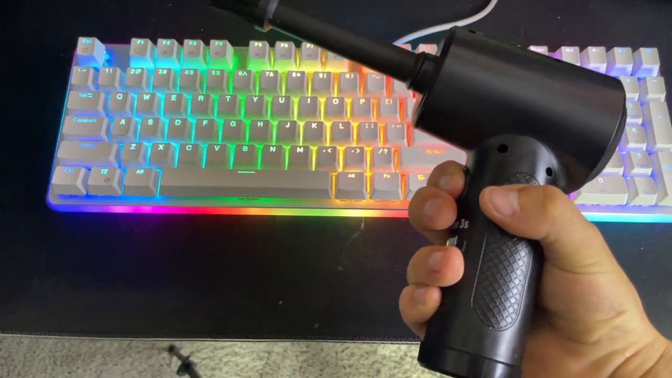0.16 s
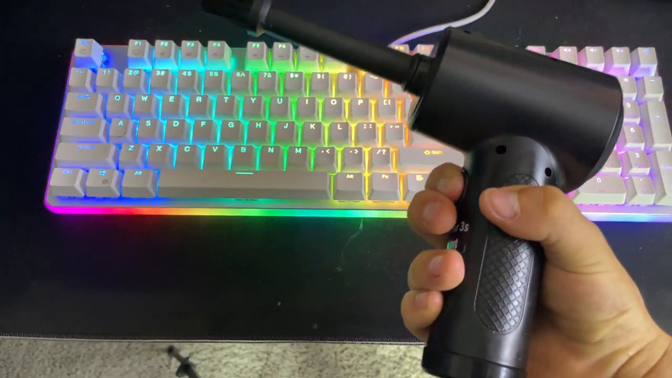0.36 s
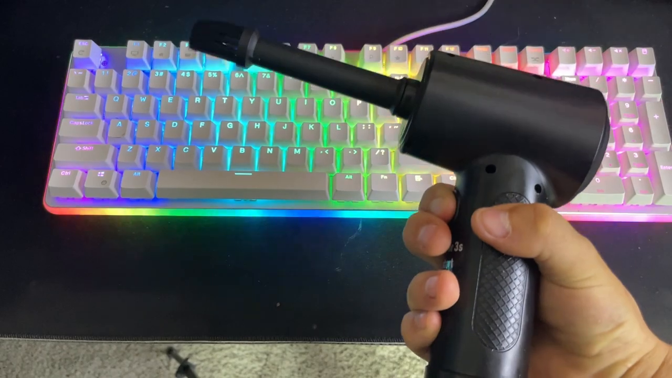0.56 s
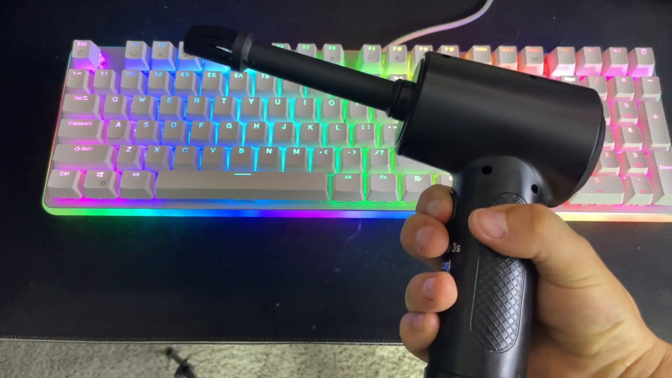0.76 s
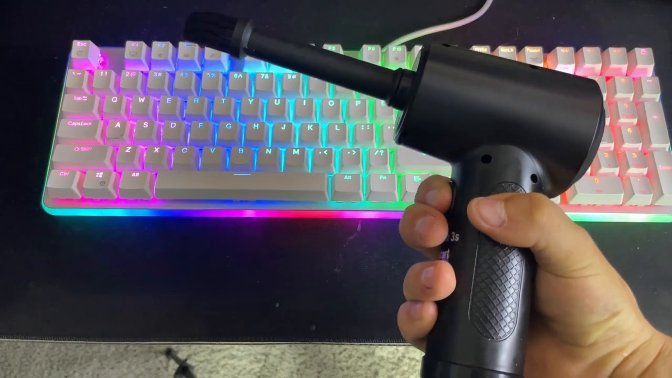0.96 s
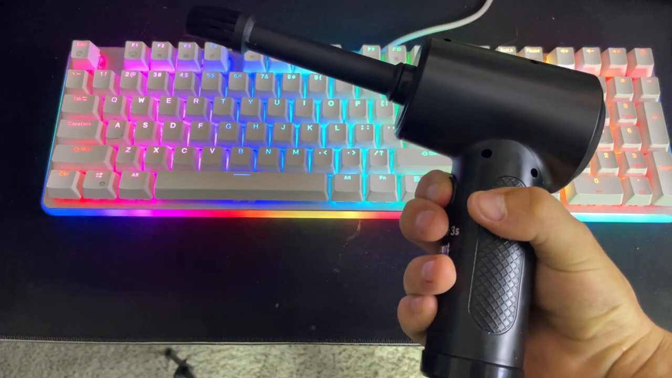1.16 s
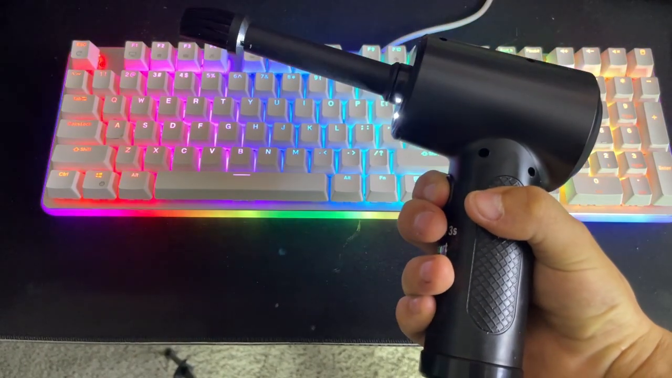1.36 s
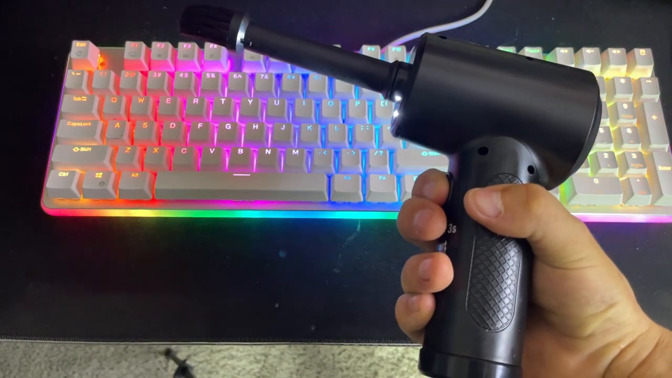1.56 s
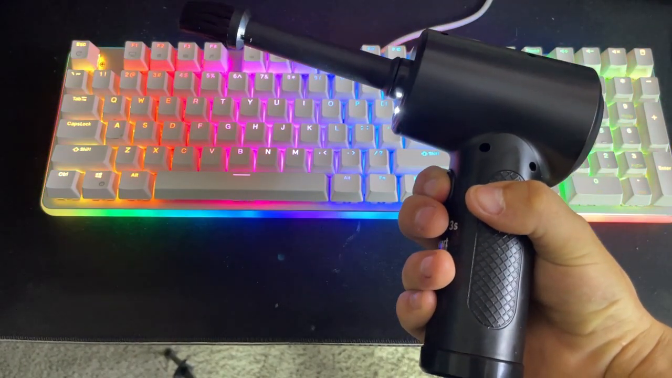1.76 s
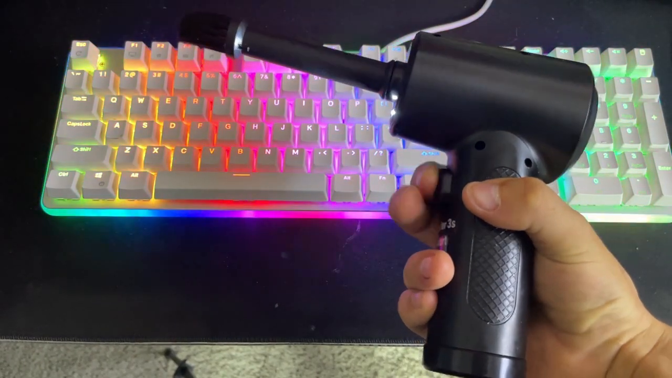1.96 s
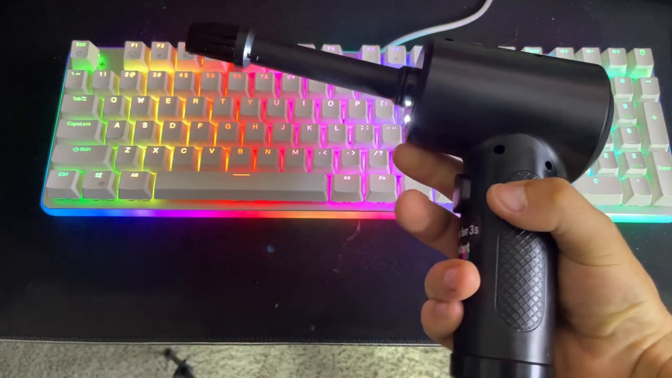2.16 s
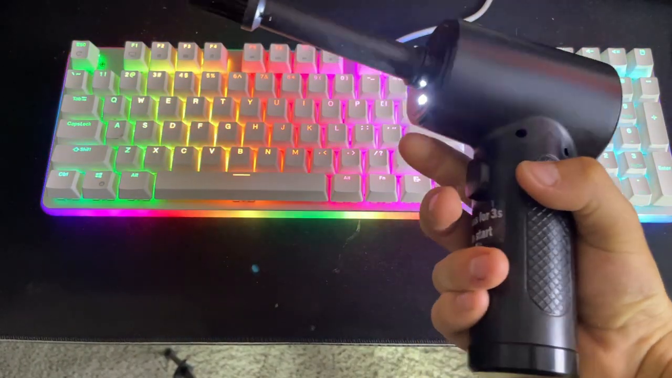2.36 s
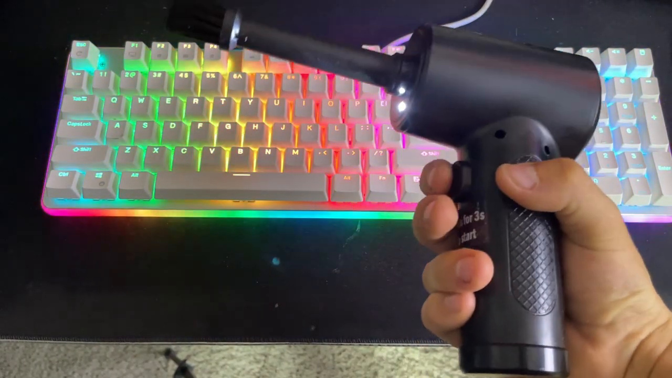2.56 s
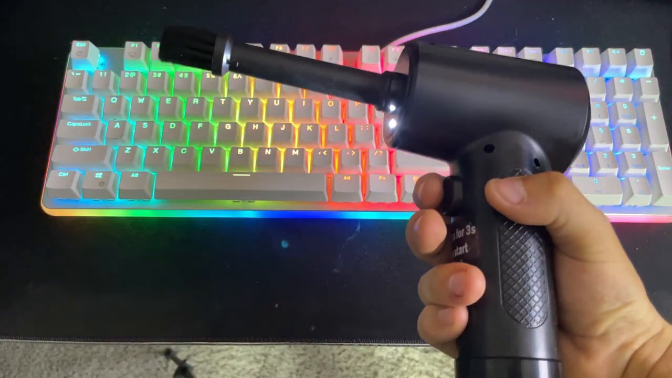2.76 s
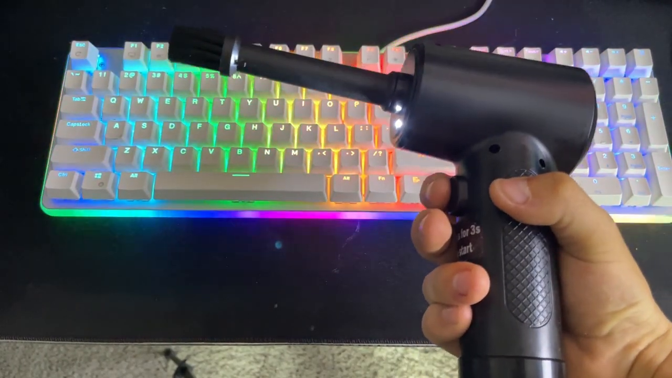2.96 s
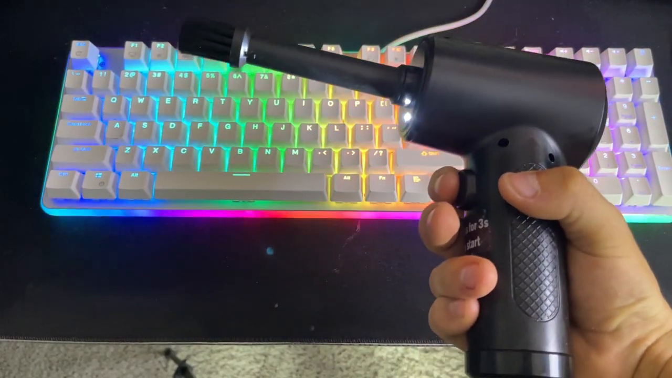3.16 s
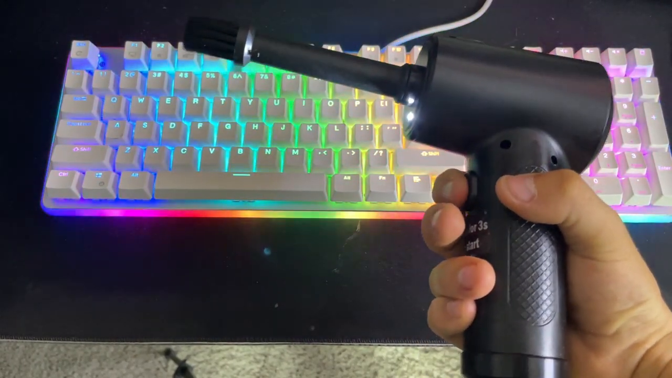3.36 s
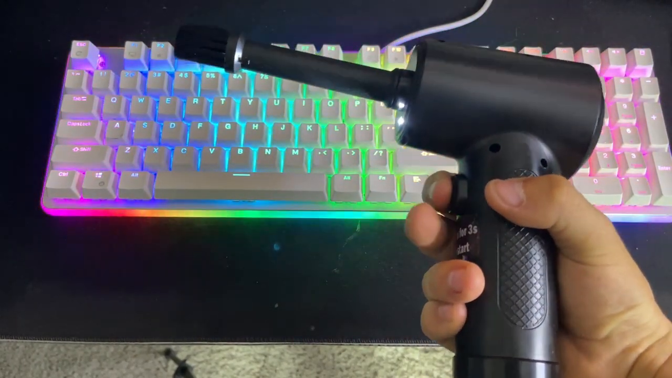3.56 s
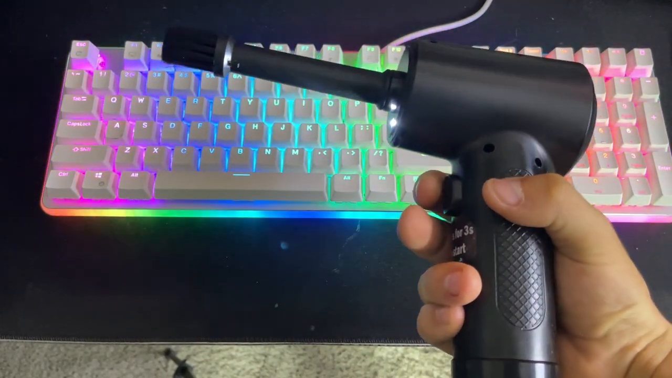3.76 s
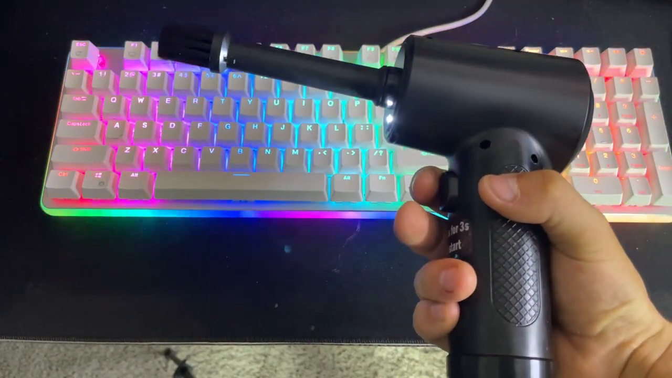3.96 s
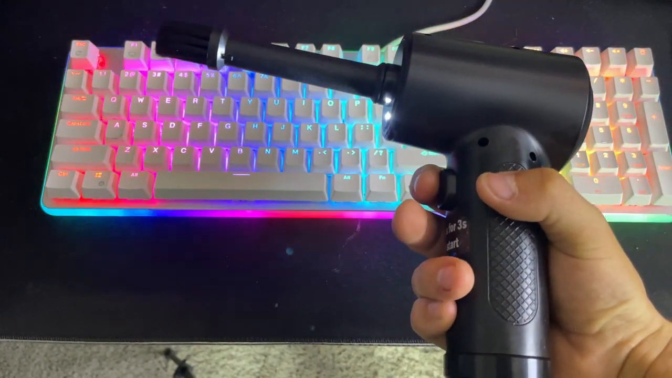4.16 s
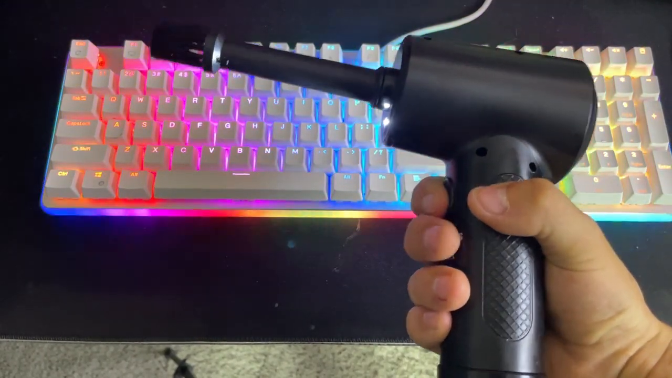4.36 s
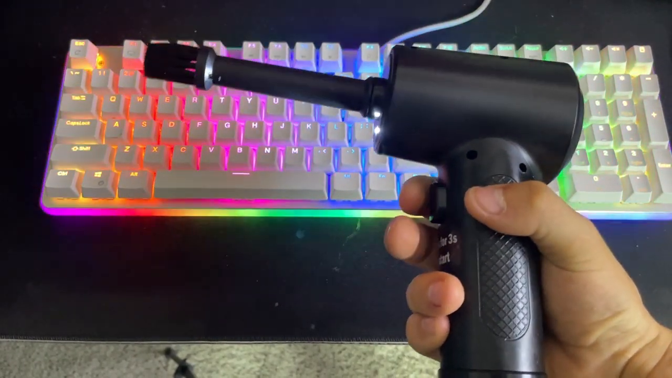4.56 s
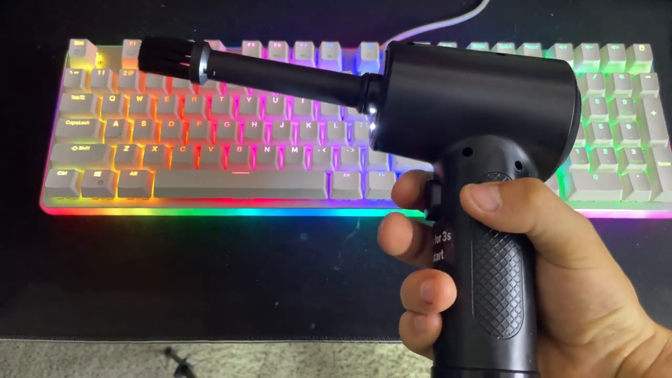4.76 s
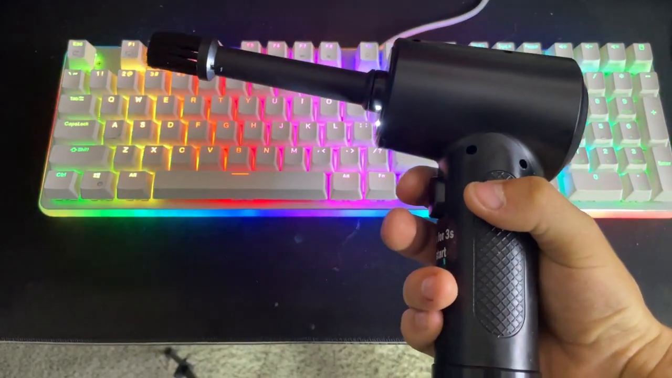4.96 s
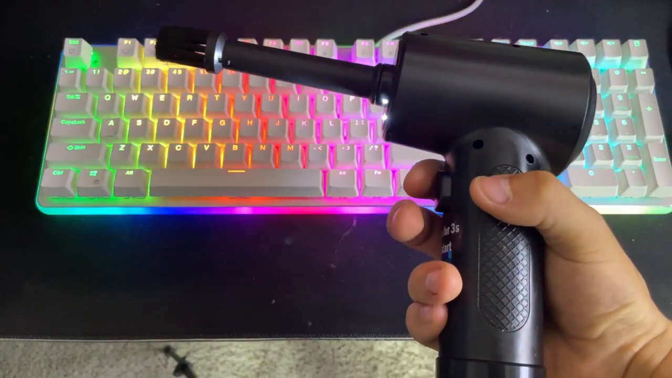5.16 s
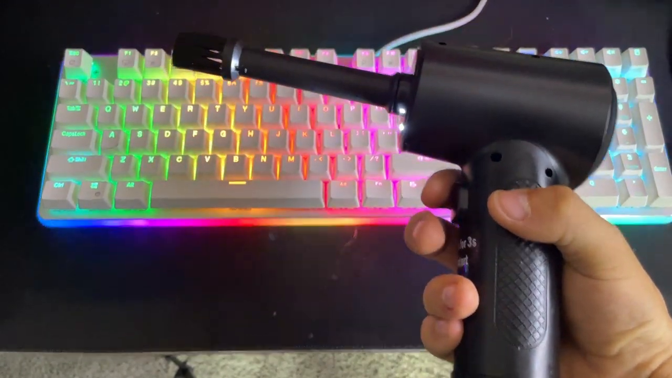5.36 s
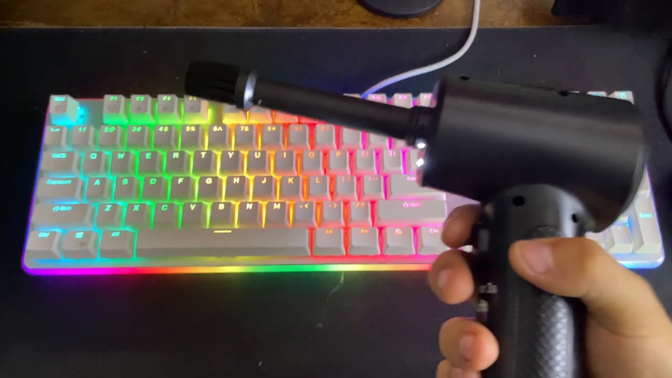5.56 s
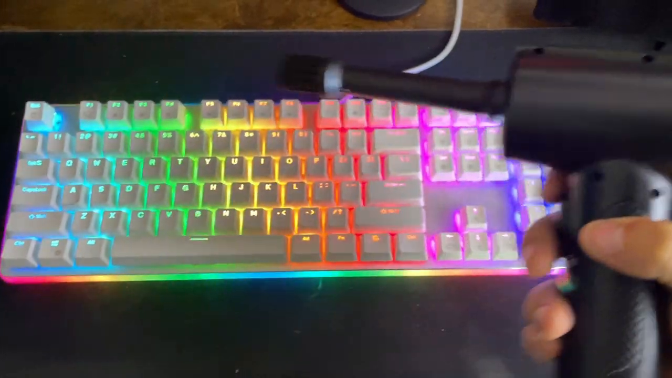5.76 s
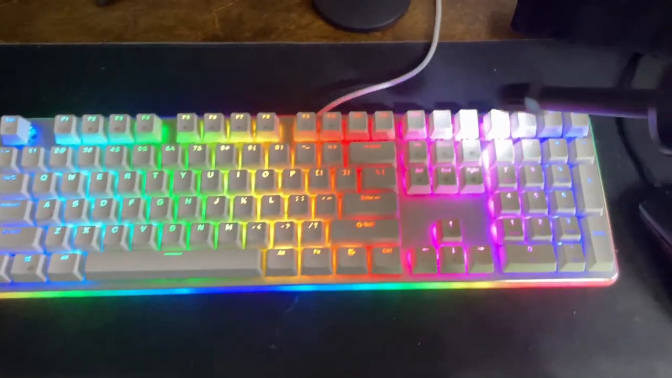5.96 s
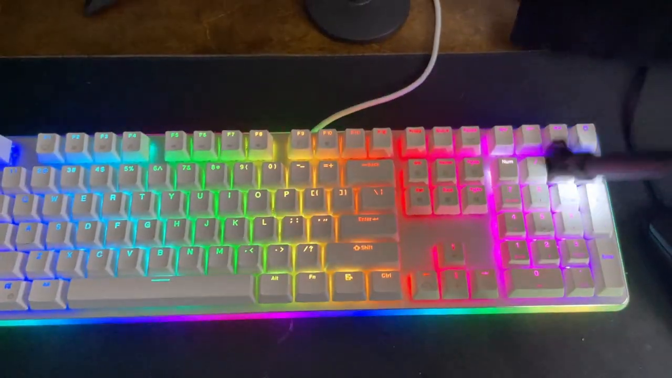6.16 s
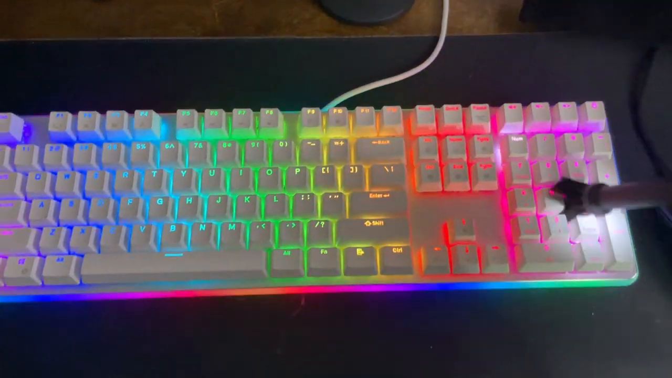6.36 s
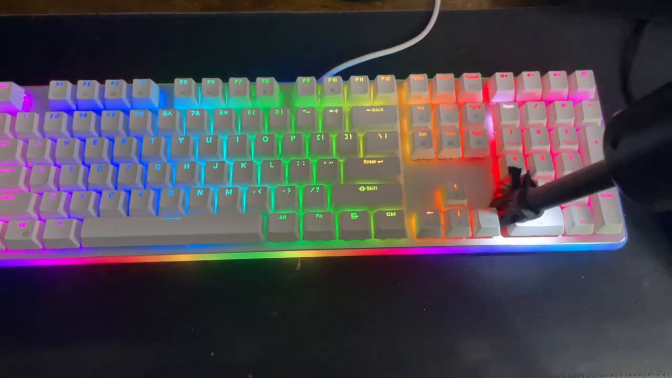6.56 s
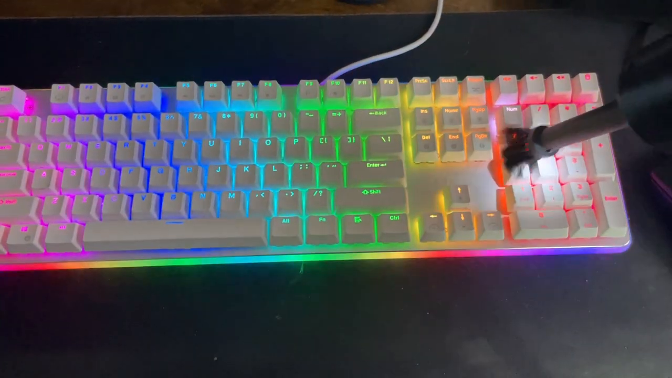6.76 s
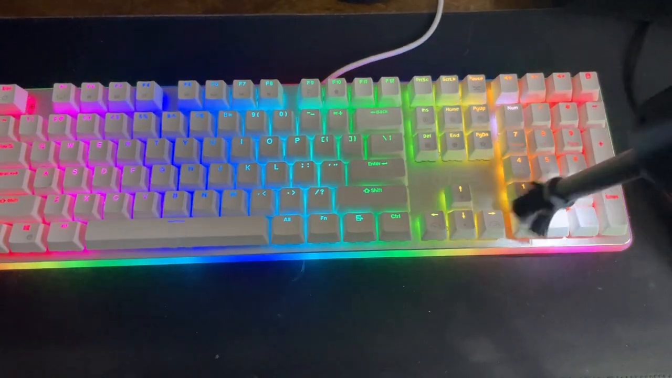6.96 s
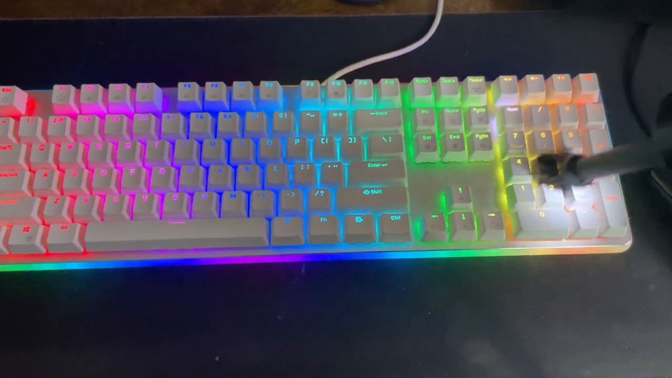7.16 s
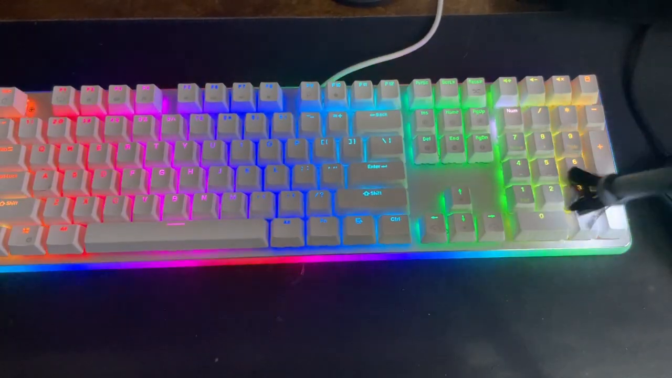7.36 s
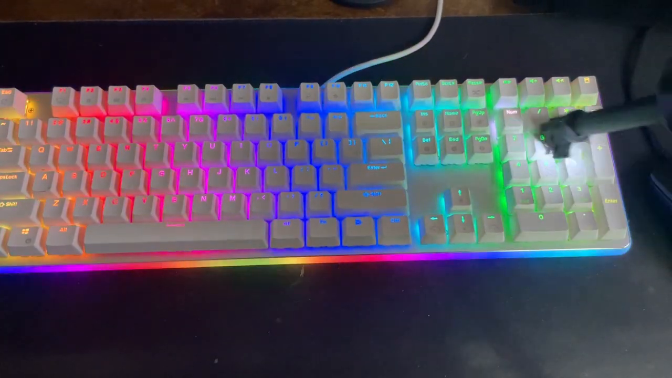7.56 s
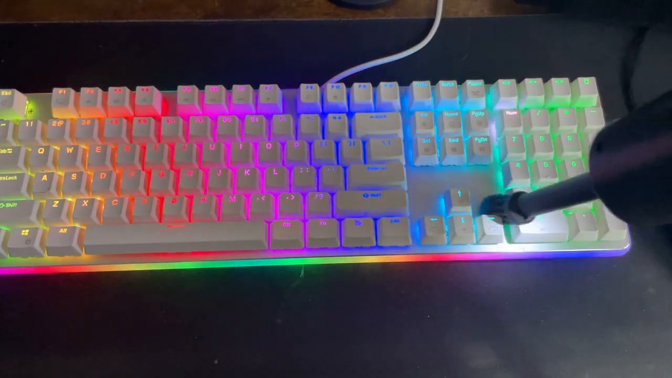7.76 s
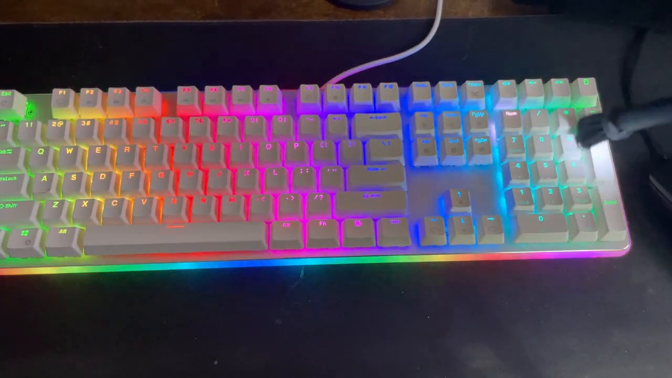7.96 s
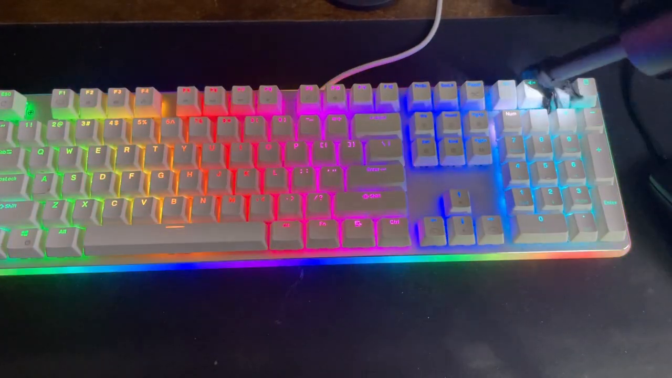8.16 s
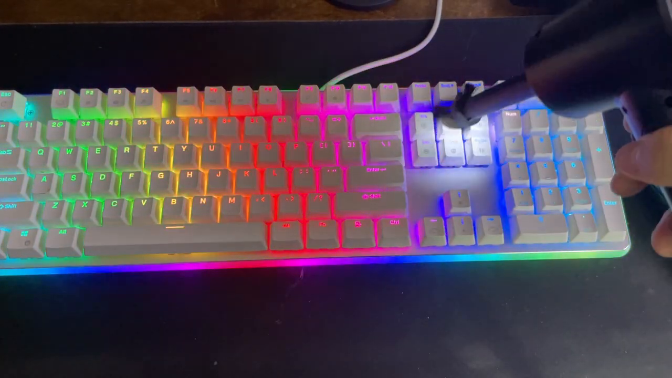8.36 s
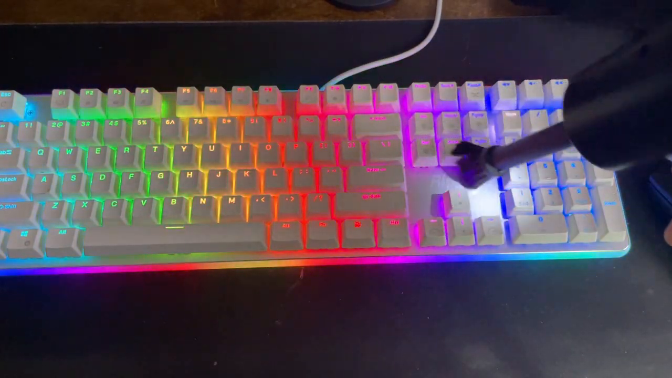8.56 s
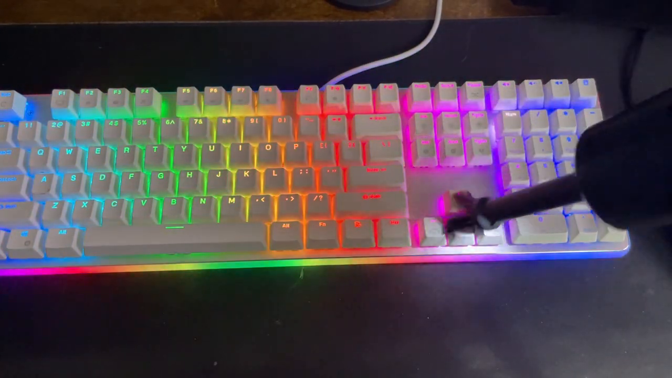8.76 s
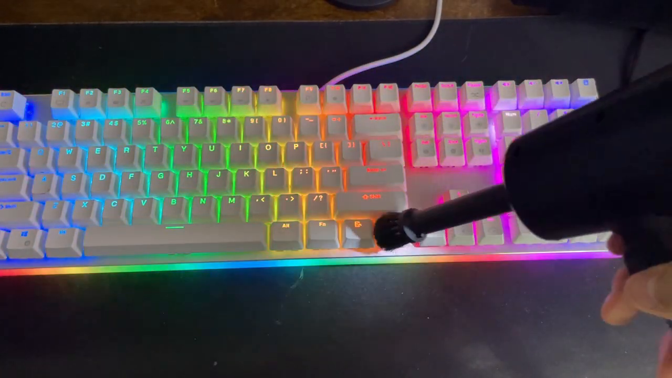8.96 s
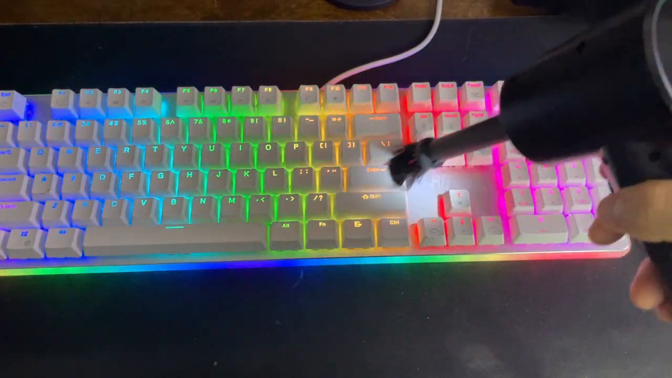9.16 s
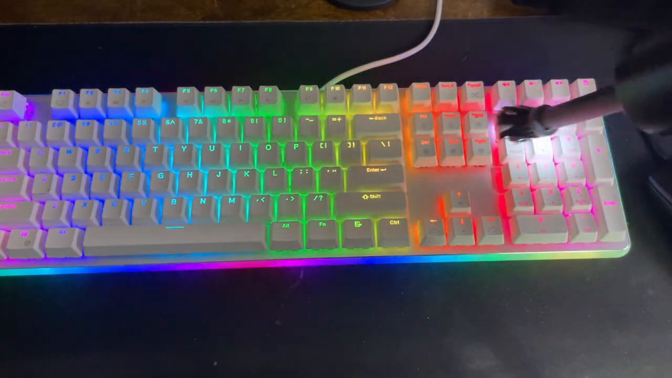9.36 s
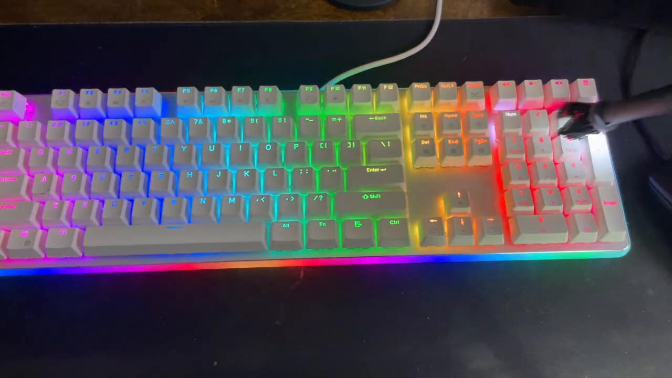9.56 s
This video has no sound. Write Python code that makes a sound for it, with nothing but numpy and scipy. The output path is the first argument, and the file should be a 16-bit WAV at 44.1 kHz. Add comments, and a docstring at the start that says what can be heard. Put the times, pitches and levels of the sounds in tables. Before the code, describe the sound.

For about 1.4 seconds there is only a quiet indoor murmur with low rumble and very faint mains hum, plus tiny soft clicks near 0.25 and 0.5 and a small button release at 1.34. From 1.5 a handheld air duster's motor spins up, buzzing first, then whining higher in steps. A tight burst of bright clicks lands around 1.95. By 3 seconds the whine is strong and the air is a broad roar; pitch and hiss keep rising until about 5.3, reaching a steady shrill tone near 785 hertz with higher overtones. Between 5.5 and 6 the duster swings round, the air dips and its colour shifts. From 6 to 9.7 the jet sweeps the keyboard, with short puffs, fluttering rasp, airy whistle and bright hiss shifting across the close stereo image. The motor stays on throughout.

```python
"""Faint clicks and a button release sound in a quiet room, beside a phone with two microphone ports.
A cordless air duster's motor then spins up in steps: a whine of shaft orders, and air noise set by speed.
Bright clicks fall early in the spin-up. Later the nozzle turns away and sweeps its jet over a keyboard:
band noises puff and flutter, and the phase and level between the ports change with the aim.
A low murmur and a mains hum run throughout."""
import sys
import numpy as np
from scipy import signal
from scipy.fft import rfft, irfft, next_fast_len
from scipy.io import wavfile
from scipy.ndimage import uniform_filter1d, map_coordinates

SR = 44100
rng = np.random.default_rng(int(sys.argv[2]) if len(sys.argv) > 2 else 0)


def persist_wave(psi):
    """Save psi, clipped to +-1, as 16-bit WAV."""
    counts = np.round(np.clip(psi, -1, 1) * 32767).astype(np.int16)
    wavfile.write(sys.argv[1], SR, np.atleast_2d(counts).T)


N = 427769
TOP_HZ = 15850  # upper band limit
ROTOR_LAG_S = .158

# drive steps, the last a slight sag once the jet meets the keys: start_s, new_speed_turns_per_s, ramp_s
SPEED_STEPS = [(1.472, 144.6, .273), (1.745, 371.9, .492), (2.238, 577.5, .483), (3.605, 690.6, .341),
               (4.491, 785.4, .295), (5.183, 789, .414), (5.873, 782.2, .738)]


def speed():
    """Rotor turns per s: ramped drive steps through a first-order inertial lag."""
    t = np.arange(N) / SR

    def lagged_ramp(u):
        return u - ROTOR_LAG_S * (1 - np.exp(-u / ROTOR_LAG_S))

    turns_per_s, before = np.zeros(N), 0
    for start_s, target, ramp_s in SPEED_STEPS:
        since_start = np.clip(t - start_s, 0, None)
        since_end = np.clip(t - start_s - ramp_s, 0, None)
        slope = (target - before) / ramp_s
        turns_per_s += slope * (lagged_ramp(since_start) - lagged_ramp(since_end))
        before = target
    return np.abs(turns_per_s)


REFERENCE_TURNS_PER_S = 800
BETWEEN_DB = -56  # order level off its modes, at reference speed, before dulling
FLICKER_DB_PER_KHZ, DULLED_DB_PER_KHZ = .3, .45  # higher lines waver more and are weaker

# order gliding through a housing mode: shaft_multiple, mode_hz, half_width_hz, level_before_dulling_db
ORDER_SURGES = [(4, 1075, 65, -49), (4, 1270, 80, -51), (4, 1670, 60, -47), (4, 1800, 90, -42),
                (4, 2280, 90, -51), (4, 2670, 130, -46), (5, 1150, 150, -51), (5, 1915, 85, -36.5),
                (5, 2180, 100, -43), (5, 2800, 250, -54), (5, 3100, 200, -46), (5, 3800, 150, -42),
                (6, 600, 200, -63), (6, 900, 70, -54), (6, 1090, 100, -41), (6, 1910, 70, -49),
                (6, 1450, 150, -55), (6, 2250, 200, -43), (6, 2570, 100, -48), (6, 3100, 200, -47),
                (6, 3450, 150, -53), (6, 4110, 100, -40), (6, 4650, 130, -40), (7, 1890, 140, -48),
                (7, 3580, 80, -42), (7, 4200, 150, -47), (7, 5380, 150, -44), (8, 1980, 120, -50),
                (8, 3210, 100, -49), (8, 4190, 80, -48), (9, 950, 150, -58), (9, 1250, 170, -53),
                (9, 1970, 150, -48), (9, 2180, 130, -54), (9, 2750, 130, -56), (9, 3150, 170, -46),
                (9, 4050, 200, -54), (9, 4800, 130, -47), (9, 5250, 200, -47), (9, 6400, 300, -40),
                (9, 7050, 150, -39), (10, 2130, 130, -57), (10, 1300, 200, -65), (11, 2200, 120, -55),
                (11, 3200, 130, -57), (12, 1020, 170, -51), (12, 1500, 200, -65), (12, 2230, 170, -52),
                (12, 3170, 200, -52), (12, 4600, 130, -52), (12, 6650, 250, -41), (12, 6900, 100, -47),
                (13, 3120, 200, -53), (13, 4000, 130, -58), (13, 5000, 130, -53), (14, 1100, 200, -62),
                (14, 2050, 130, -56), (14, 3200, 150, -53), (14, 4100, 130, -56), (14, 5000, 150, -52),
                (14, 6200, 350, -53), (15, 1000, 250, -62), (15, 2100, 250, -58), (15, 3170, 190, -44.5),
                (15, 4100, 150, -54), (15, 5320, 200, -52), (15, 6600, 500, -50), (15, 10800, 400, -48),
                (16, 1150, 200, -64), (16, 2300, 130, -58), (16, 3350, 180, -55), (16, 4800, 180, -58),
                (16, 12520, 200, -49), (17, 2150, 200, -57), (18, 1000, 150, -57), (18, 2350, 150, -59),
                (18, 3500, 150, -57), (18, 5170, 200, -56), (18, 6800, 350, -48), (18, 10450, 350, -51),
                (19, 2250, 200, -61), (19, 5250, 200, -56), (21, 1050, 200, -63), (21, 2200, 150, -65),
                (21, 12130, 100, -46), (21, 3480, 200, -57), (21, 5480, 200, -57), (24, 1050, 200, -65),
                (24, 2300, 200, -60), (24, 3600, 200, -62), (27, 1050, 200, -66), (27, 2200, 200, -64),
                (27, 3850, 450, -61), (27, 5300, 250, -60), (27, 6950, 300, -53), (29, 5300, 200, -60),
                (29, 6900, 400, -56), (31, 6950, 400, -52), (33, 7000, 350, -59), (36, 5400, 250, -63),
                (36, 7050, 350, -57)]


def higher_orders(turns_per_s, angle):
    """Each higher shaft order grows with speed and surges as it crosses housing modes."""
    whine = np.zeros(N)
    speeds = np.arange(0, 2 * REFERENCE_TURNS_PER_S, .5)
    for order in sorted({row[0] for row in ORDER_SURGES}):
        body = amp(BETWEEN_DB) * speeds / REFERENCE_TURNS_PER_S
        for multiple, mode_hz, half_hz, db in ORDER_SURGES:
            if multiple == order:
                body = body + amp(db) * np.exp(-((order * speeds - mode_hz) / half_hz) ** 2)
        in_band = order * speeds < TOP_HZ
        level = np.interp(turns_per_s, speeds, body * in_band)
        khz = order * turns_per_s / 1000
        flicker_db = (1 + FLICKER_DB_PER_KHZ * khz) * wobble(22)
        tone = np.sin(order * angle + rng.uniform(0, 2 * np.pi))
        whine += level * amp(flicker_db - DULLED_DB_PER_KHZ * khz) * tone
    return whine


SECOND_AIMED_DB = -9  # second-order change once aimed at the keys

# first order, notched by shell and desk: speed_turns_per_s, base_db, left_right_db, left_lead_rad
IMBALANCE_BY_SPEED = [(79, -82, 0, 0), (206, -74, 0, 0), (229, -51, -2, 0), (325, -49, -5, .2),
                      (387, -36.5, -4, 0), (437, -36, -3, -.2), (445, -55, -9, -.3), (467, -37, -5, -0.093),
                      (533, -25.5, -2, 0), (584, -25.5, -3, .1), (631, -23.5, -0.5, -0.31),
                      (658, -23, -5, -0.56), (674, -32.5, -4, -.6), (677.5, -26, -4.5, -0.74),
                      (717, -24, 3, -0.59), (796.6, -20, 9.5, 0.0058)]
# second order: speed_turns_per_s, base_db
SECOND_BY_SPEED = [(79, -85), (220, -70), (280, -62), (350, -60), (385, -56), (415, -48), (460, -45),
                   (485, -57), (520, -58), (570, -55), (600, -47), (645, -46), (685, -44), (710, -41),
                   (745, -45), (785, -34.5)]
# third order: speed_turns_per_s, base_db
THIRD_BY_SPEED = [(20, -90), (80, -72), (165, -64), (190, -68), (234, -66), (250, -50), (284, -49),
                  (300, -57), (318, -48), (334, -39.5), (350, -37.5), (372, -37.5), (388, -40), (405, -50),
                  (435, -44), (480, -37), (530, -38.5), (574, -34.5), (595, -33), (620, -43), (648, -38),
                  (668, -44), (687, -35), (710, -31), (740, -35), (770, -39), (785, -48.5)]
# duster position and aim: changes of first and third order over time, added:
# time_s, first_db, first_left_right_db, first_left_lead_rad, third_db
ORDER_CHANGES = [(5.0, 0, 0, 0, 0), (5.3, 2, -2, .8, 0), (5.65, 2, -9, .8, 3), (5.95, -6, -7, .9, -1),
                 (6.2, -7, -14, 1.3, 10), (6.5, -7, -6, 1.1, 5), (6.8, -5, -4, .9, 4),
                 (7.4, -5, -11, 1.3, 3), (7.7, -4, -6, 1.2, 7), (8.0, -7, -10, .9, 2), (8.3, -7, -7, .7, 6),
                 (8.6, -4, -5, 1.1, 11), (9.2, -4, -3, 1.3, 6), (9.5, -8, -9, .8, -1),
                 (9.7, -9, -9, .8, -1)]


def motor():
    """Rotor imbalance sings at shaft speed; magnets and blades add higher orders through the housing."""
    turns_per_s, changes = speed(), curves(ORDER_CHANGES)
    first_db, pan_db, lead_rad = along(IMBALANCE_BY_SPEED, turns_per_s) + changes[:3]
    second_db = along(SECOND_BY_SPEED, turns_per_s) + SECOND_AIMED_DB * aim()
    third_db = along(THIRD_BY_SPEED, turns_per_s) + changes[3]
    angle = 2 * np.pi * np.cumsum(turns_per_s + 0.77 * wobble(40)) / SR
    phases = angle + np.array([lead_rad, -lead_rad]) / 2
    first = amp(first_db + 0.34 * wobble(30)) * sides(pan_db) * np.sin(phases)
    second = amp(second_db + 1.6 * wobble(8.7)) * np.sin(2 * angle)
    third = amp(third_db + 2.2 * wobble(25)) * np.sin(3 * angle)
    whine = second + third + higher_orders(turns_per_s, angle)
    return np.sqrt(2) * (first + heard(np.array([whine, 0.22 * whine])))


# shell bands: centre_hz, width_hz, relative_db
SHELL_BANDS = [(560, 300, 0), (790, 60, 1), (1030, 260, 0), (2150, 220, 1), (3250, 300, -7),
               (3800, 300, -6), (4700, 300, -15), (5300, 400, -12), (6000, 400, -15), (6900, 700, -9)]
# buzz level: speed_turns_per_s, level_db
BUZZ_BY_SPEED = [(0, -120), (6, -90), (14, -75), (25, -68), (45, -62), (65, -58), (140, -55), (220, -52),
                 (300, -51), (785, -55)]


def buzz():
    """Rough rotor noise fills the shell's bands, at a level set by speed."""
    def shell(hz):
        return sum(amp(db) * peak(hz, centre, width) ** 2 for centre, width, db in SHELL_BANDS)
    return heard(amp(along(BUZZ_BY_SPEED, speed())) * patchy_noise(shell, patchy_db=3.0))


TUBE_WIDTH_HZ = 144

# tube note, drifting with distance to the keys: time_s, centre_hz, added_db
TUBE_DRIFT = [(5.5, 1175, -1), (5.85, 1180, 4.5), (6.2, 1185, 10), (6.75, 1184, 8), (6.95, 1137, 7.5),
              (7.3, 1123, 4), (7.75, 1130, 8.5), (8.1, 1152, 3), (8.7, 1108, 7), (9.0, 1140, 3),
              (9.4, 1152, 6), (9.7, 1153, 6)]


def tube_note():
    """Narrow tube-resonance noise, frequency-shifted to a sliding centre; also its level in dB."""
    centre_hz, db = curves(TUBE_DRIFT)
    pair = patchy_noise(lambda hz: peak(hz, centre_hz[0], TUBE_WIDTH_HZ) ** 2, patchy_db=1.0)
    slide = 2 * np.pi * np.cumsum(centre_hz - centre_hz[0]) / SR
    quadrature = filtered(pair, lambda hz: -1j * (hz > 0))
    return pair * np.cos(slide) - quadrature * np.sin(slide), db


UPPER_ROAR_HZ = 1750
LOW_RASP_TO_HZ, UPPER_RASP_HZ, TOP_RASP_HZ = 3000, 3700, 5070
WHISTLE_HZ, WHISTLE_WIDTH_HZ = 6620, 1830
BODY_SHOWN_PAN_DB, BODY_AIMED_PAN_DB = 1.2, -1.2  # left-right

# noise spectra: freq_hz, relative_db_per_hz
ROAR_SHAPE = [(90, -120), (130, -24), (300, -13), (700, -5), (1000, -5), (1500, -4.5), (1900, 1.5),
              (2300, 1.5), (2700, -10), (3200, -120)]
RASP_SHAPE = [(2000, -120), (2600, -0.5), (3200, 1), (3700, -1), (4200, -6), (4700, -5), (5300, -4.5),
              (5900, -8.5), (7000, -120)]
HISS_SHAPE = [(4500, -120), (5600, -2), (6500, -3.5), (8000, 8.5), (9200, 3), (10000, 3), (12000, 3.5),
              (13500, 3), (15000, -1), (17000, -4)]
# air flow: speed_turns_per_s, relative_db
FLOW_BY_SPEED = [(8, -70), (25, -53), (60, -48), (123, -29), (213, -22), (327, -17.5), (415, -12.5),
                 (501, -8.5), (577, -6), (688, -2.5), (785, 0)]
# roar, tube, rasp, whistle, hiss: base_db, flow_steepness, puff_share, flutter_db
AIR_LAYERS = [(-28, 0.92, 0.085, 0.5), (-44, 0.67, 0.43, 1), (-27, 0.99, 0.83, 0.21),
              (-33.5, 1.26, 0.052, 0.52), (-31, 0.97, 0.15, 0.77)]
# nozzle aim, added: time_s, roar_db, rasp_db, whistle_db, hiss_db, whistle_left_right_db
NOZZLE_SWEEP = [(3.0, 2, -1.5, 4, -0.5, -0.5), (3.55, 2.5, -1, 2, 0, -1), (4.3, 2.5, 0.5, 3.5, 0.5, -.3),
                (5.3, 0, 1, 1.5, 0.5, -1), (5.45, -1.5, -0.5, -1, -0.5, -1), (5.58, -2, -3.5, -4.5, -3, -1),
                (5.76, -7.5, -8, -7, -3.5, 1), (5.86, -5, -5.5, -2, -3, 5), (5.97, -1, -7, 4, 1, -3),
                (6.3, -2.5, -5.5, 4.5, 2, -2), (6.72, -3, -3.5, 4.5, 3, 0), (6.9, -1.5, -4.5, 3, 3.5, 5),
                (7.05, -2.5, -4.5, 6, 3.5, -1), (7.4, -4, -4.5, 3.5, 2, -2.5), (7.78, -1.5, 1, 4.5, 4, 4),
                (7.95, -4, -3, 4.5, 2, -3), (8.2, -3.5, -5, 0, 0, 2), (8.4, -4, 0.5, -7, 2, 4),
                (8.6, -1.5, -2, 0.5, 2.5, 7), (8.78, -2, -2, 4.5, 3, 3), (8.95, -1, -0.5, -3.5, 2, 5),
                (9.25, -3.5, -0.5, -5.5, 2, 6), (9.45, -4, -2, 5, 1, 0), (9.7, -4.5, -3.5, 2, 0.5, -3)]
# jet crossing gaps between keys: time_s, puff_db, half_length_s, extra_upper_rasp_db
GAP_PUFFS = [(6.166, 5.5, .03, -2.5), (6.323, 1.5, 0.069, 6), (6.56, 7.5, .03, -2.5), (6.86, 6.5, 0.05, 3),
             (7.162, 3.5, .03, 0), (8.045, 5.5, .02, 1), (8.713, 8.5, .025, -3.5), (8.91, 3.5, 0.033, -4)]
# colour of the jet on the keys: time_s, upper_roar_db, middle_rasp_db, top_rasp_db
JET_TINT = [(5.4, 1.5, 4.5, -17), (5.55, -2, 0.5, 1), (5.85, 2, 1.5, -5), (6.05, 0, 4.5, 11),
            (6.2, 3.5, 6.5, 5), (6.33, -1, 4, -8), (6.42, -1.5, 6, 1), (6.52, 2, 4, -8), (6.7, 1, 0.5, -3),
            (6.95, 2.5, 4.5, 0), (7.12, 0.5, 1.5, 1), (7.3, 3, 2.5, 1), (7.42, -1.5, 4, 5), (7.6, 2, -2, 1),
            (7.75, 2.5, 3, -13), (7.9, -0.5, 0.5, -1), (8.1, 2.5, 1, 1), (8.3, 4.5, -2, 2.5),
            (8.6, 3.5, 2, 1), (8.78, 1.5, 6, -7), (8.92, 1.5, -1.5, 1), (9.05, 3.5, -3, 3),
            (9.17, 3, -4, 6.5), (9.28, 4.5, -2, 2), (9.42, 4.5, -2, -2), (9.55, 0, 4, -1), (9.7, 2, 2, 0)]
# lowest part of the rasp: time_s, added_db
LOW_RASP_LEVEL = [(5.7, -3), (5.9, 1), (6.2, 0), (6.38, -8), (6.6, 2.5), (6.9, -0.5), (7.1, -1), (7.28, 1),
                  (7.4, -4), (7.65, 4), (7.85, -3), (8.1, -2), (8.35, 0), (8.55, 1), (8.7, 0.5), (8.8, -2),
                  (8.9, 2), (9.05, 1), (9.3, -1), (9.5, -1), (9.7, -8)]


def air():
    """Intake roar and tube resonance at the body; rasp, edge whistle and hiss from the jet."""
    t, flow_db = np.arange(N) / SR, along(FLOW_BY_SPEED, speed())
    roar_db, rasp_db, whistle_db, hiss_db, whistle_pan_db = curves(NOZZLE_SWEEP)
    note, tube_db = tube_note()
    puff_db, puff_upper_db = np.zeros(N), np.zeros(N)
    for s, db, half_s, upper_db in GAP_PUFFS:
        bump = np.exp(-((t - s) / half_s) ** 2)
        puff_db += db * bump
        puff_upper_db += upper_db * bump

    gust = wobble(12)  # shared by all layers
    gains = []
    for row, aim_db in zip(AIR_LAYERS, (roar_db, tube_db, rasp_db, whistle_db, hiss_db)):
        base_db, steepness, share, flutter_db = row
        flutter = flutter_db * (gust + wobble(7))
        gains.append(amp(base_db + steepness * flow_db + aim_db + share * puff_db + flutter))
    roar, tube, rasp, whistle, hiss = gains

    def shape(points):
        return lambda hz: amp(along(points, hz))

    upper_roar_db, middle_db, top_db = curves(JET_TINT)
    low_db, = curves(LOW_RASP_LEVEL)
    roar_noise = lifted(patchy_noise(shape(ROAR_SHAPE), patchy_db=1.18), UPPER_ROAR_HZ, upper_roar_db)
    body = roar * roar_noise + tube * note
    edge = whistle * patchy_noise(lambda hz: peak(hz, WHISTLE_HZ, WHISTLE_WIDTH_HZ) ** 3, patchy_db=0.0)
    # raise all, then undo it above the low part
    rasp_noise = patchy_noise(shape(RASP_SHAPE), patchy_db=1.5)
    grit = amp(low_db) * lifted(rasp_noise, LOW_RASP_TO_HZ, -low_db)
    grit = lifted(grit, UPPER_RASP_HZ, puff_upper_db + middle_db)
    grit = lifted(grit, TOP_RASP_HZ, top_db - middle_db)
    wide = rasp * grit + hiss * patchy_noise(shape(HISS_SHAPE), patchy_db=0.9)
    body_pan_db = BODY_SHOWN_PAN_DB + aim() * (BODY_AIMED_PAN_DB - BODY_SHOWN_PAN_DB)
    return sides(body_pan_db) * blown(body) + sides(whistle_pan_db) * blown(edge) + blown(wide)


# reflections off desk, keys and screen: delay_s, gain_db
NEAR_ECHOES = [(.0026, -53), (.0043, -25.5), (.0061, -33), (.0088, -14.5), (0.012, -25), (0.0159, -23),
               (.0227, -19)]


def blown(pair):
    """Air noise as heard: near echoes ripple its spectrum."""
    def ripple(hz):
        return 1 + sum(amp(db) * np.exp(-2j * np.pi * hz * s) for s, db in NEAR_ECHOES)
    return heard(filtered(pair, ripple), side_on, facing)


# tube and shell colour seen from the side: centre_hz, width_hz, db_over_the_rest
SIDE_COLOUR = [(820, 150, -10.5), (1360, 240, 4.5), (1720, 77, 3.5), (2250, 270, -5), (2530, 740, -3),
               (3070, 380, 3), (3770, 210, -8), (4160, 140, 7.5), (4700, 90, -2), (5150, 210, 6.5),
               (5830, 250, -0.5), (6080, 430, 4), (7380, 180, 3.5), (7640, 140, 3), (9510, 150, 8)]


def side_on(hz):
    """Resonant colour of the air while the duster is seen from the side."""
    return amp(sum(db * peak(hz, c, w) ** 2 for c, w, db in SIDE_COLOUR) - 1.5)


# colour while the nozzle points at the keys: centre_hz, width_hz, colour_db
FACING_COLOUR = [(1030, 73, -6.5), (2610, 210, -1.5)]


def facing(hz):
    """Resonant colour of the air while the duster points at the keys."""
    return amp(sum(db * peak(hz, c, w) ** 2 for c, w, db in FACING_COLOUR))


# bands opening during the turn: time_s, half_length_s, centre_hz, width_hz, level_db
SWING_BANDS = [(5.63, 0.24, 2280, 230, -31.5), (5.54, 0.15, 3740, 370, -31.5),
               (5.72, 0.067, 3800, 260, -38), (5.78, 0.15, 3200, 230, -37), (5.58, 0.23, 1400, 240, -39.5)]


def swing():
    """Narrow noise bands stand out at overlapping times as the duster swings round."""
    t, bands = np.arange(N) / SR, 0
    for s, half_s, centre, width, db in SWING_BANDS:
        noise = patchy_noise(lambda hz: peak(hz, centre, width) ** 2, patchy_db=0.5)
        bands = bands + amp(db) * np.exp(-((t - s) / half_s) ** 4) * noise
    return heard(bands)


BUTTON_S, BUTTON_DB = 1.3379, -68  # power button lets go; mode levels add to this

# clicks: start_s, level_db, pitch_hz, t60_s, crack_share
CLICK_EVENTS = [(.2503, -61, 2250, .015, 0.2), (.5072, -65, 2150, .015, 0), (1.9445, -30, 6000, .008, .6),
                (1.9494, -17, 12500, 0.0054, 1), (1.9502, -22, 6900, .005, 0.2),
                (1.952, -27, 13500, 0.015, 0.8), (1.9556, -17.5, 14200, 0.0067, 0.7),
                (1.96, -21, 13500, 0.0065, 0.8)]
# button modes: freq_hz, added_db, t60_s
BUTTON_MODES = [(1090, 13, .02), (2500, 2, .012), (4650, -1, .07), (4740, -9, .07), (6400, -12, .05)]


def clicks():
    """Each click mixes a short ring with a broad bright crack; the button rings in its modes."""
    out, t = np.zeros(N + SR), np.arange(SR // 20) / SR
    for s, db, hz, t60, share in CLICK_EVENTS:
        crack = np.diff(rng.standard_normal(len(t) + 1)) * .5
        sound = (1 - share) * np.sin(2 * np.pi * hz * t) + share * crack
        attack = 1 - np.exp(-t / .0001)
        out[round(s * SR):][:len(t)] += amp(db - 60 * t / t60) * attack * sound
    for hz, db, t60 in BUTTON_MODES:
        ring = amp(BUTTON_DB + db - 60 * t / t60) * np.sin(2 * np.pi * hz * t)
        out[round(BUTTON_S * SR):][:len(t)] += ring
    return ports(np.array([out[:N], np.zeros(N)]), SHOWN_PORTS)


# duster turn: time_s, aim (0 shown, 1 at the keys)
AIM_TURN = [(5.55, 0.088), (5.95, 0.97)]


def aim():
    """Turn of the duster from shown (0) to aimed at the keys (1)."""
    return curves(AIM_TURN)[0]


# ports while shown: freq_hz, left_lead_rad, likeness, left_right_db
SHOWN_PORTS = [(101, -1.1, 1, -3), (905, 0.92, 1, -7.5), (1370, 0.71, 0.75, -3), (2080, 0.39, 0.99, -1.5),
               (2700, 0.8, 0.98, -3.5), (3200, 0.63, 0.98, 2.5), (3640, 1.3, 0.98, 3.5),
               (4520, -1.56, 1, 0), (5040, .5, 0.5, -2), (5530, -1, 0.4, 6.5), (6600, -1.43, 1, -2.5)]
# ports while aimed at the keys: freq_hz, left_lead_rad, likeness, left_right_db
AIMED_PORTS = [(100.43, -0.0095, 0.99, 2), (685, 0.9, 0.66, -2.5), (1280, -1.3, 1, -3.5),
               (2100, -0.8, 0.8, 1), (2680, 1.35, 0.31, 1), (3200, 1, 0.21, 2.5), (4500, 1.2, 0.66, -0.068),
               (5800, 2.5, 0.12, 1), (6140, -0.41, 0.34, -4.5), (6570, 0.1, 0.44, -0.5)]


def heard(pair, colour=lambda hz: 1, aimed_colour=lambda hz: 1):
    """Equal-power crossfade of the ports' view as the duster turns towards the keys."""
    turn_rad = aim() * np.pi / 2
    shown = ports(pair * np.cos(turn_rad), SHOWN_PORTS, colour)
    return shown + ports(pair * np.sin(turn_rad), AIMED_PORTS, aimed_colour)


MONO_HZ = 13200

# treble at both aims: left-right phase and likeness by frequency, nearly opposite near 8.7 kHz:
# freq_hz, left_lead_rad, likeness, left_right_db
TREBLE_PORTS = [(7400, -2.3, .76, 0), (8000, -2.8, .86, 0), (8600, -3.14, .985, 0), (9200, -3.35, .94, 0),
                (9800, -3.9, .78, 0), (11600, -5.05, .8, 0), (13300, -6.28, .9, 0)]


def ports(pair, table, colour=lambda hz: 1):
    """Left and right from direct and scattered noise; no phase or likeness difference above MONO_HZ."""
    def mix(sign):
        def response(hz):
            lead_rad, likeness, pan_db = along(table + TREBLE_PORTS, hz)
            spread = np.arccos(np.clip(likeness, 0, 1)) / 2 * (hz < MONO_HZ)
            lead_rad = np.where(hz < MONO_HZ, lead_rad, -2 * np.pi)
            gain = colour(hz) * amp(sign * pan_db / 2) * np.exp(.5j * sign * lead_rad)
            return gain * [np.cos(spread), sign * np.sin(spread)]
        return filtered(pair, response).sum(axis=0)
    return np.array([mix(1), mix(-0.99)])


ROOM_BASE_DB = -57
HUM_HZ, HUM_BASE_DB = 59, -69

# murmur spectrum: freq_hz, relative_db_per_hz
ROOM_SHAPE = [(21, -35), (36, -18), (64, -13.5), (92, -16), (190, -15.5), (222, -11.5), (258, -4.5),
              (300, -15.5), (358, -10.5), (472, -23), (523, -16.5), (763, -27), (1550, -32), (2840, -52.5),
              (15000, -66)]
# murmur between channels: freq_hz, left_right_likeness
ROOM_LIKENESS = [(60, 0.92), (180, 0.92), (550, 0.13), (1650, -0.38), (4970, 0.23), (15000, -0.08)]
# low end of the room: time_s, added_db
RUMBLE_LEVEL = [(0, 6), (2.8, 4), (2.92, 10), (3.7, 6.5), (5.0, 8), (5.8, 8.5), (6.3, 5.5), (8.1, 2.5),
                (8.29, 10), (8.4, 4), (9.7, 1)]


def room():
    """Murmur of the house as mid and side noise, plus mains hum; the low end changes level."""
    def mid_side(hz):
        spread = np.arccos(np.clip(along(ROOM_LIKENESS, hz), -1, 1)) / 2
        return np.array([np.cos(spread), np.sin(spread)])

    noise = patchy_noise(lambda hz: amp(along(ROOM_SHAPE, hz)), patchy_db=0.5)
    mid, side = filtered(noise, mid_side)
    hum = amp(HUM_BASE_DB + 2.2 * wobble(3.9)) * np.sin(2 * np.pi * HUM_HZ * np.arange(N) / SR)
    murmur = amp(ROOM_BASE_DB) * np.array([mid + side, mid - side]) + hum
    low = filtered(murmur, lambda hz: 1 / (1 + (hz / 140) ** 4))
    return murmur - low + low * amp(curves(RUMBLE_LEVEL)[0])


def patchy_noise(gain, patchy_db):
    """Two unrelated noises sharing random time-frequency patches of gain; rms 1 over the pair."""
    z = signal.stft(rng.standard_normal((2, N)), nperseg=512)[2]
    field = uniform_filter1d(rng.standard_normal(z.shape[1:]), size=6, axis=0)
    field = uniform_filter1d(field, size=12, axis=1)
    pair = signal.istft(z * amp(patchy_db * unit(field)), nperseg=512)[1][:, :N]
    return unit(filtered(pair, gain))


def lifted(x, from_hz, db):
    """x with all above from_hz raised by db, which may change in time."""
    return x + (amp(db) - 1) * filtered(x, lambda hz: 1 / (1 + (from_hz / (hz + 1)) ** 12))


def filtered(x, response):
    """x times a complex response of frequency."""
    m = next_fast_len(N + 8192)
    return irfft(rfft(x, m) * response(np.fft.rfftfreq(m, 1 / SR)), m)[..., :N]


def peak(hz, centre_hz, width_hz):
    """Gain of one resonance, 1 at its centre."""
    return hz * width_hz / np.hypot(centre_hz ** 2 - hz ** 2, hz * width_hz + 1e-9)


def wobble(rate):
    """A smooth random curve, rate knots per s."""
    knots = rng.standard_normal(int(N * rate / SR) + 4)
    return map_coordinates(knots, [np.arange(N) * rate / SR])


def along(points, hz):
    """Columns after the first, read on a log axis of frequency or speed."""
    f, *cols = np.transpose(points)
    return np.squeeze([np.interp(np.log(hz + 1), np.log(f + 1), c) for c in cols])


def curves(rows):
    """One value per sample for each column after the time."""
    s, *cols = np.transpose(rows)
    return [np.interp(np.arange(N) / SR, s, c) for c in cols]


def sides(db):
    """Left and right gains for a left-right difference in dB."""
    return amp(np.array([db, -db]) / 2)


def amp(db):
    """Gain of a level in dB."""
    return 10 ** (np.asarray(db) / 20)


def unit(x):
    """x at rms 1."""
    return x / np.sqrt(np.mean(x ** 2) + 1e-20)


def scene():
    """Motor, buzz, air, swing bands, clicks and room, summed."""
    return motor() + buzz() + air() + swing() + clicks() + room()


def record(dry):
    """The phone keeps nothing above TOP_HZ, after a 250 Hz wide fade."""
    return filtered(dry, lambda hz: np.sin(np.clip((TOP_HZ - hz) / 250, 0, 1) * np.pi / 2) ** 2)


dry = scene()
out = record(dry)
persist_wave(out)
```